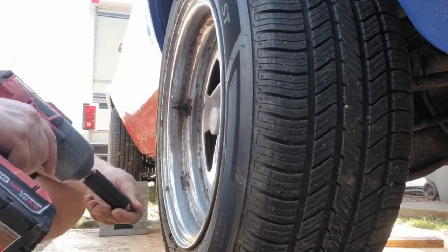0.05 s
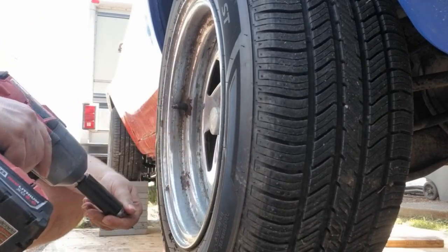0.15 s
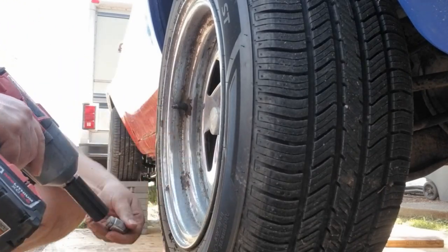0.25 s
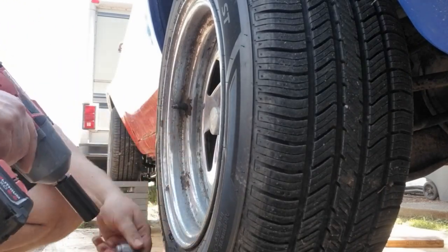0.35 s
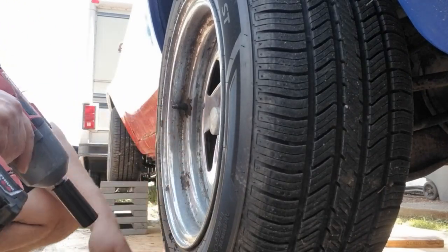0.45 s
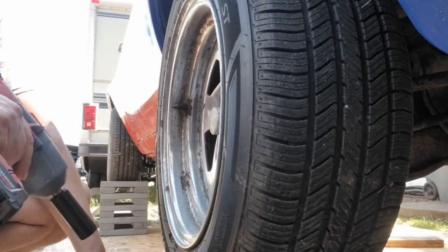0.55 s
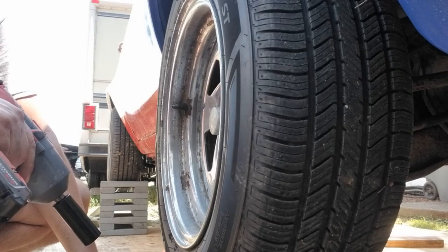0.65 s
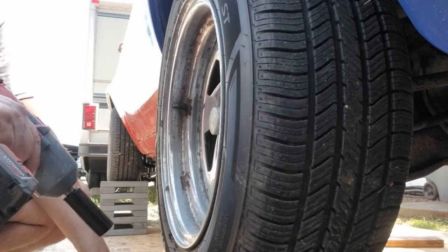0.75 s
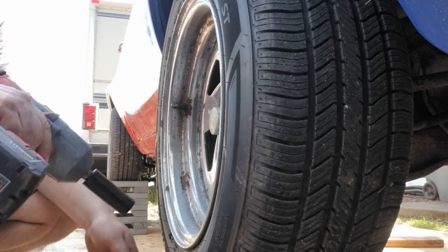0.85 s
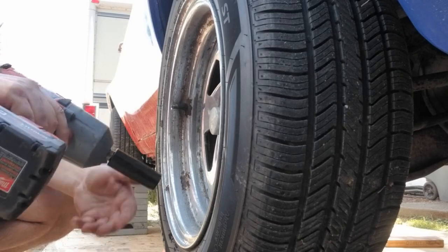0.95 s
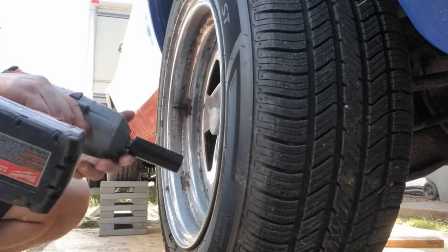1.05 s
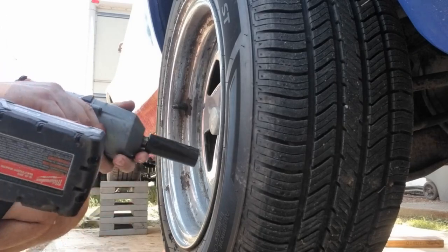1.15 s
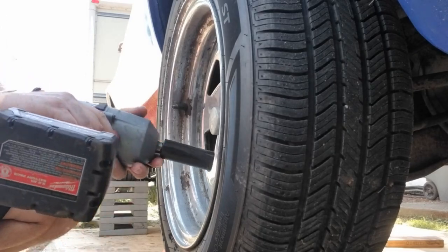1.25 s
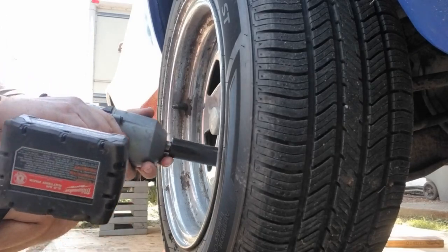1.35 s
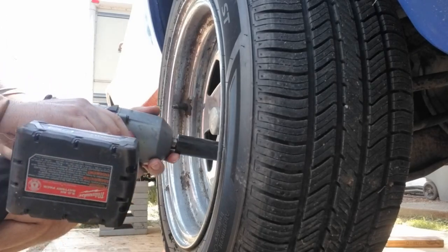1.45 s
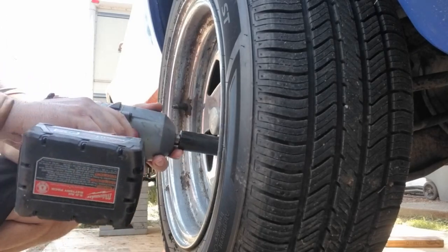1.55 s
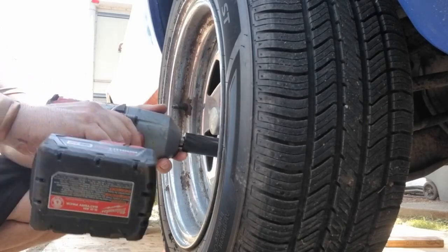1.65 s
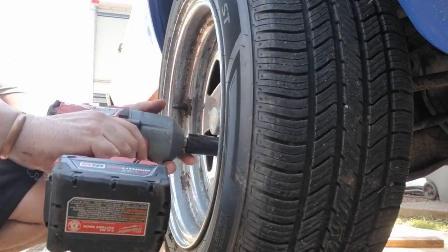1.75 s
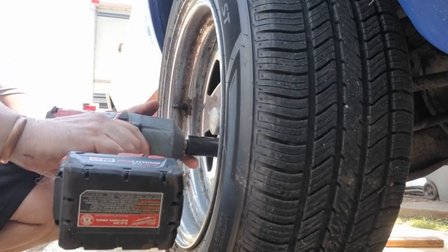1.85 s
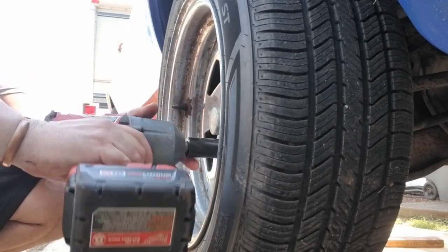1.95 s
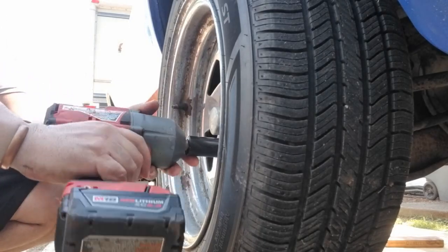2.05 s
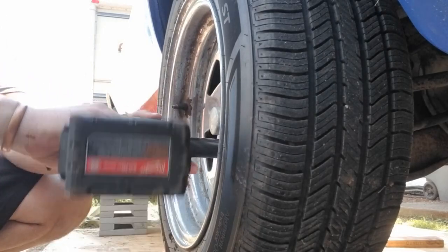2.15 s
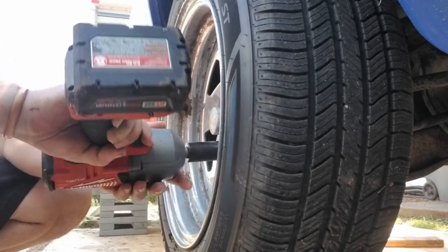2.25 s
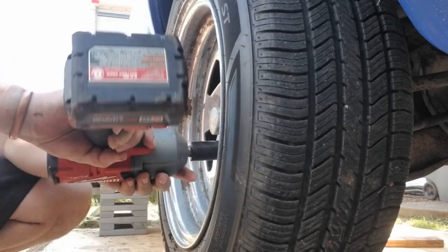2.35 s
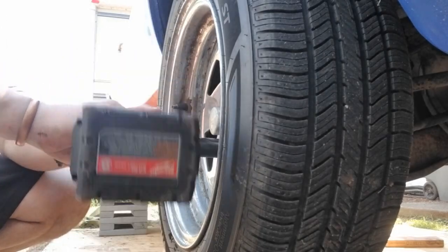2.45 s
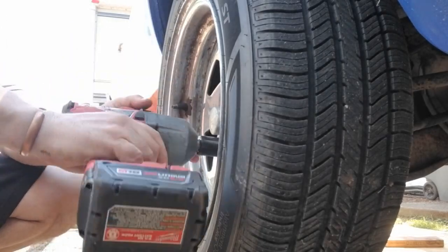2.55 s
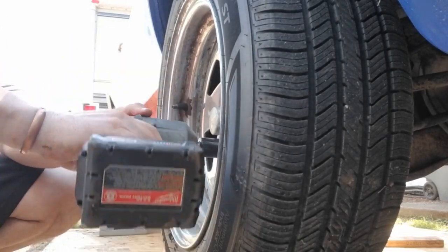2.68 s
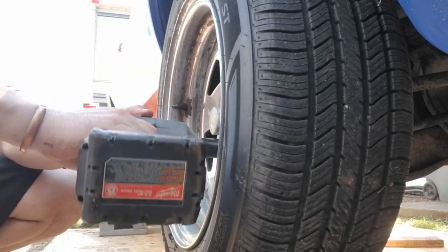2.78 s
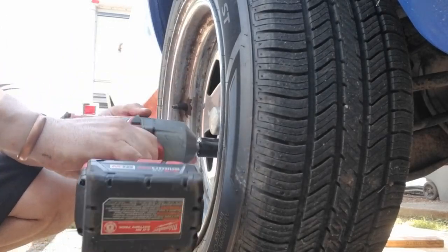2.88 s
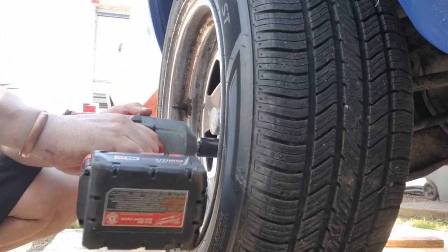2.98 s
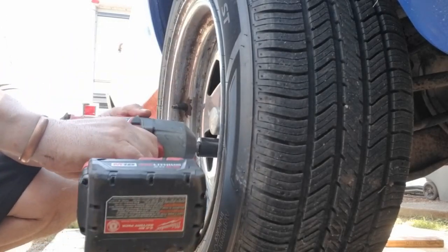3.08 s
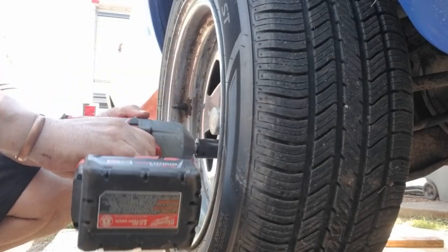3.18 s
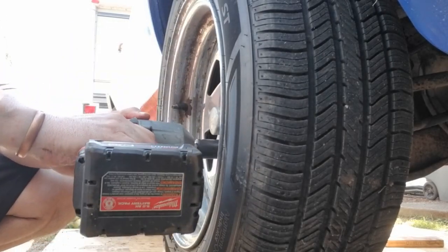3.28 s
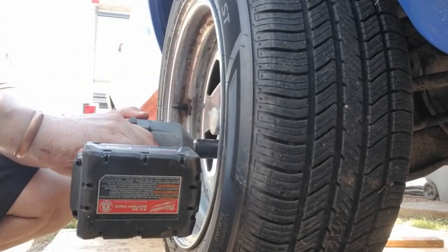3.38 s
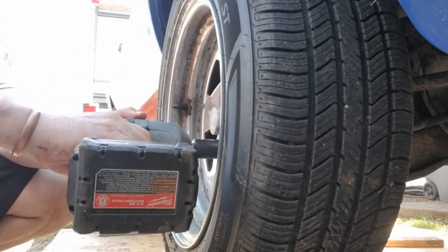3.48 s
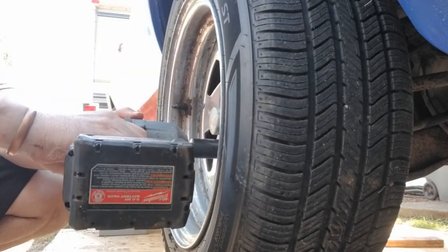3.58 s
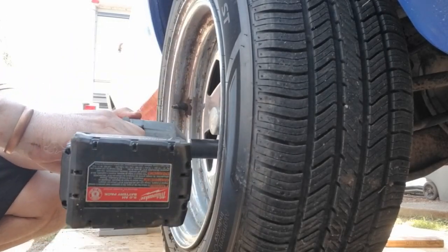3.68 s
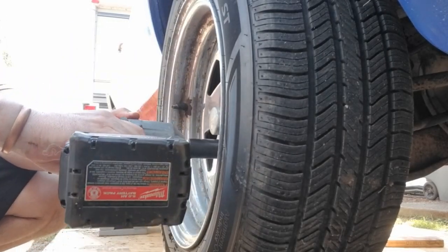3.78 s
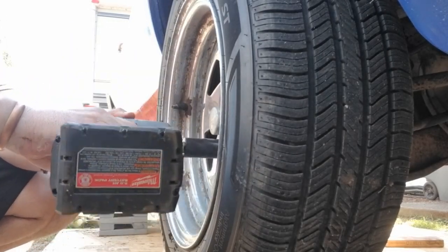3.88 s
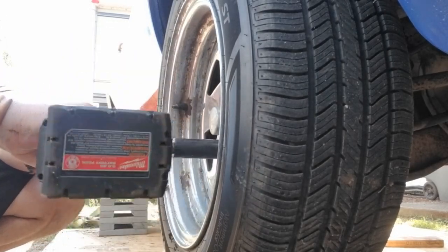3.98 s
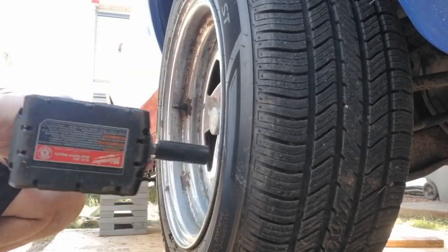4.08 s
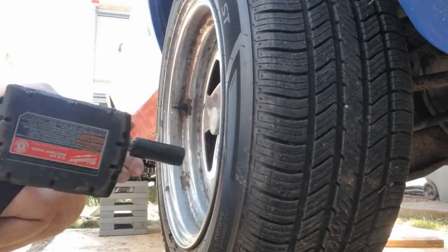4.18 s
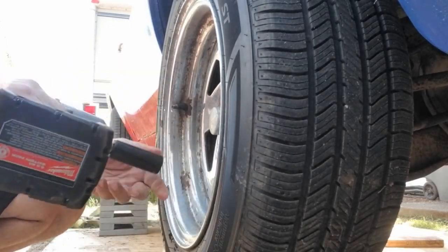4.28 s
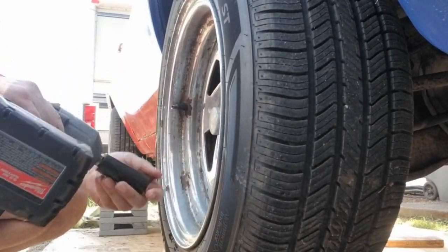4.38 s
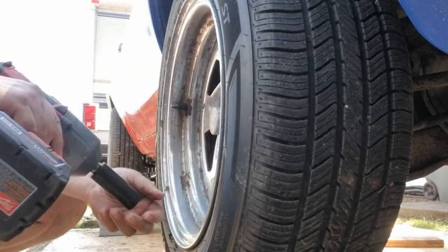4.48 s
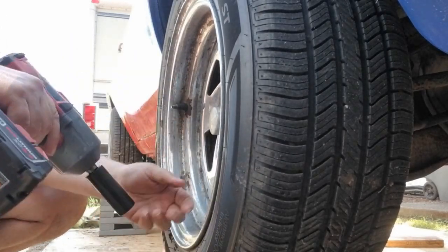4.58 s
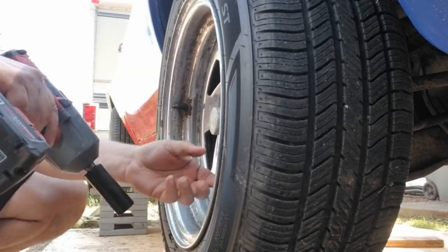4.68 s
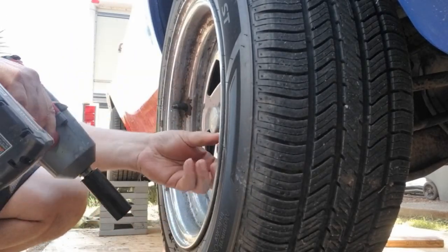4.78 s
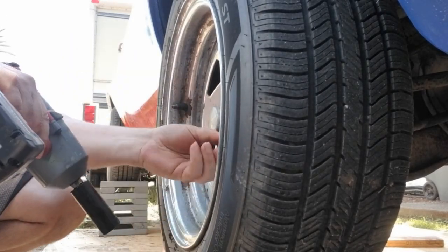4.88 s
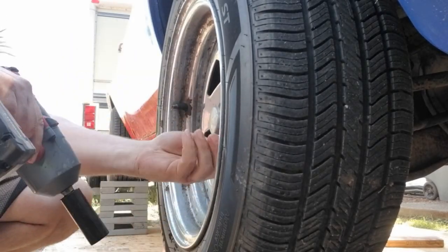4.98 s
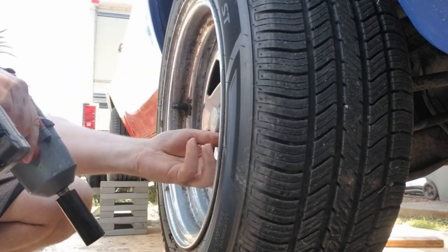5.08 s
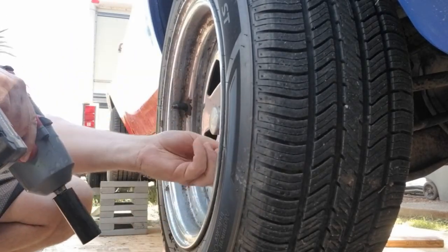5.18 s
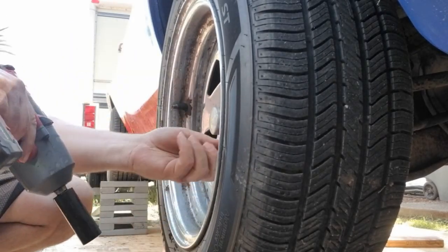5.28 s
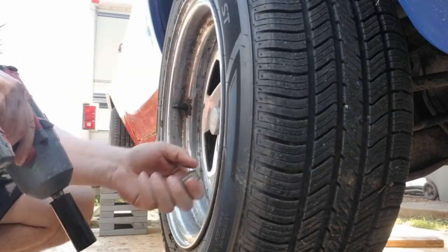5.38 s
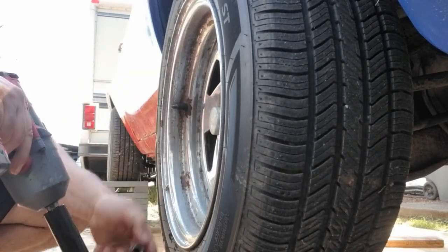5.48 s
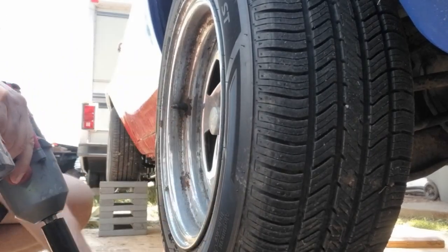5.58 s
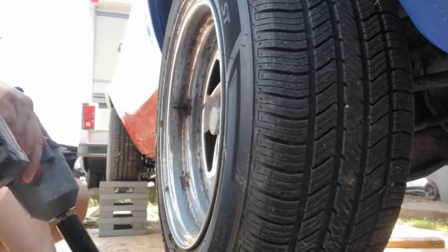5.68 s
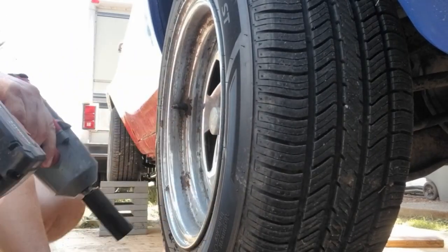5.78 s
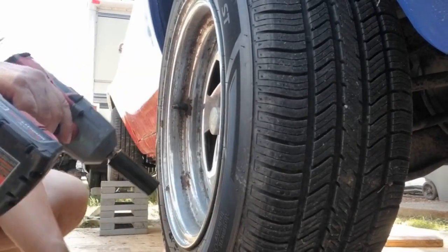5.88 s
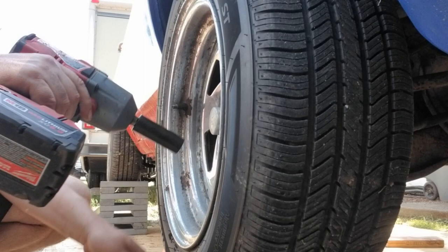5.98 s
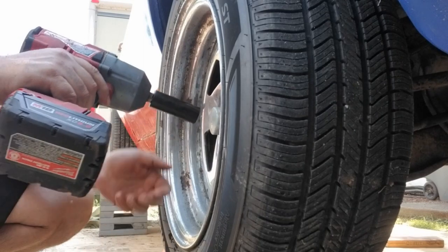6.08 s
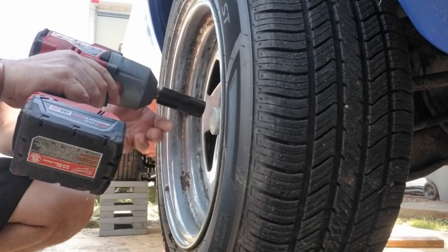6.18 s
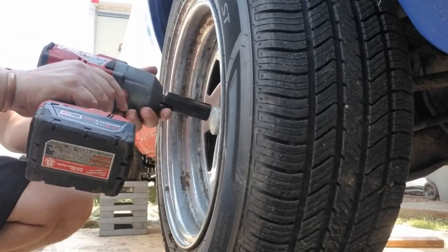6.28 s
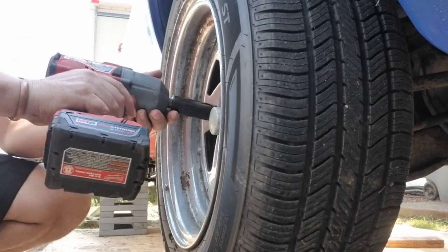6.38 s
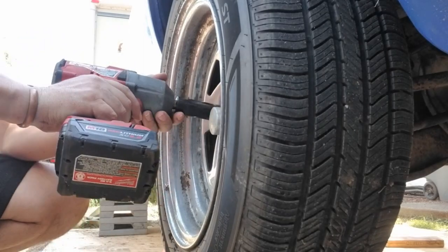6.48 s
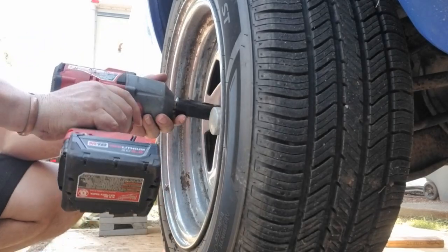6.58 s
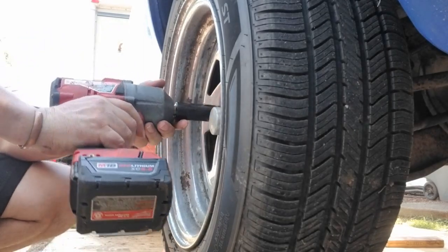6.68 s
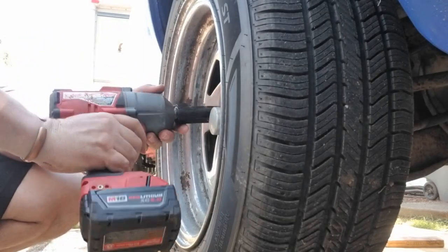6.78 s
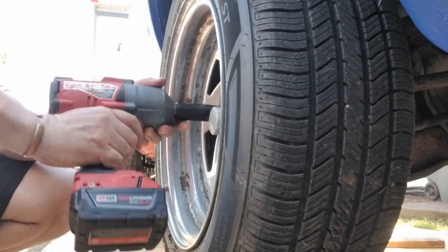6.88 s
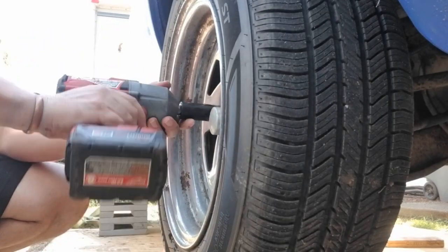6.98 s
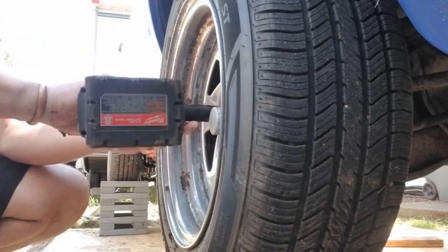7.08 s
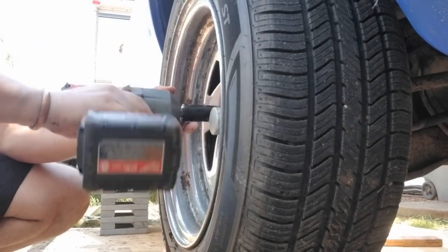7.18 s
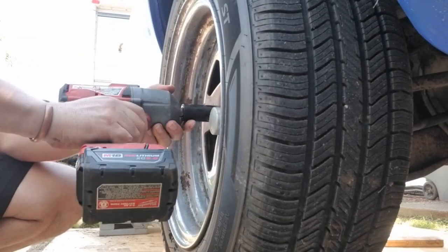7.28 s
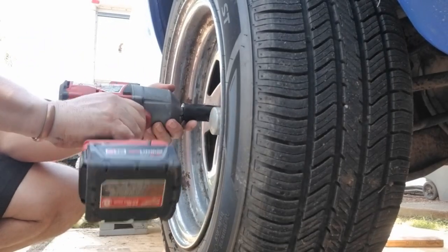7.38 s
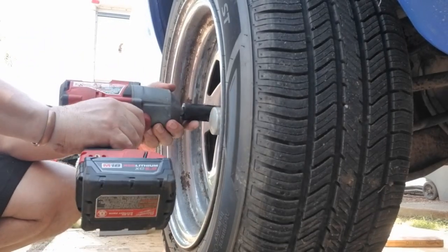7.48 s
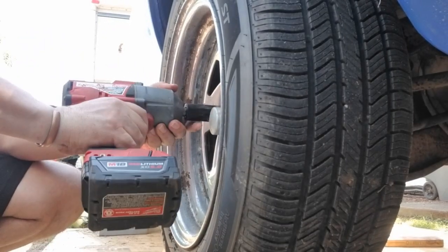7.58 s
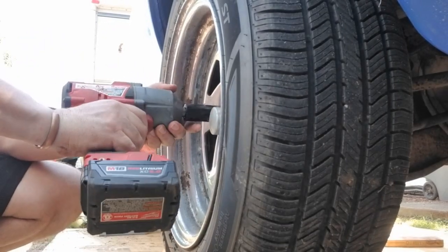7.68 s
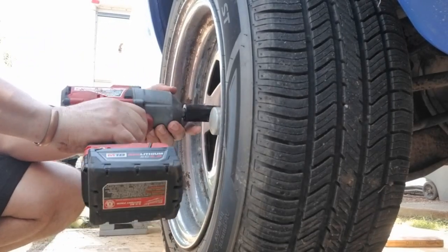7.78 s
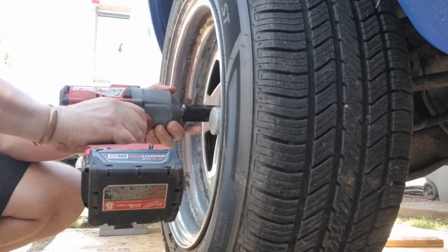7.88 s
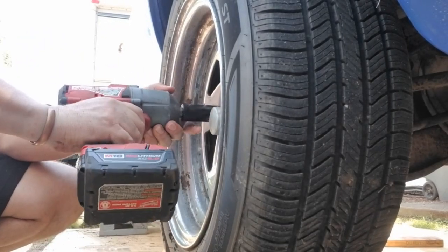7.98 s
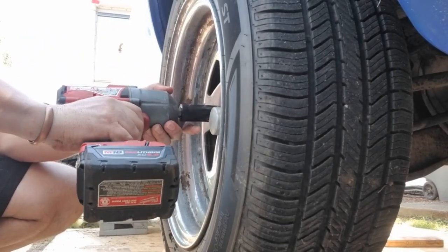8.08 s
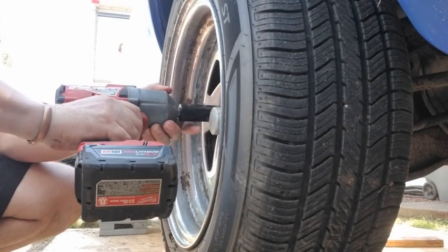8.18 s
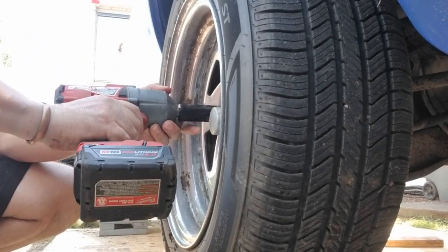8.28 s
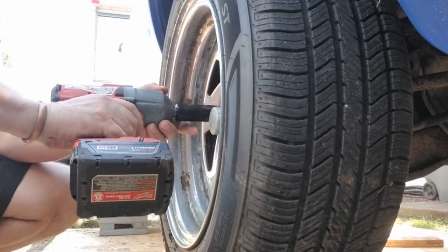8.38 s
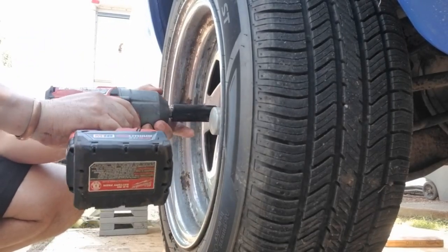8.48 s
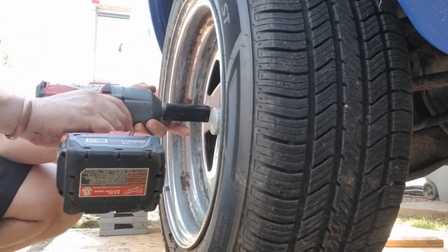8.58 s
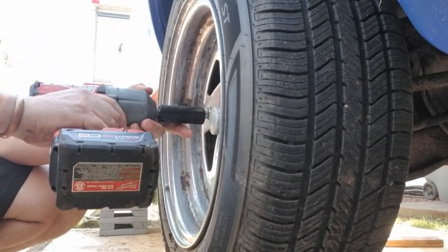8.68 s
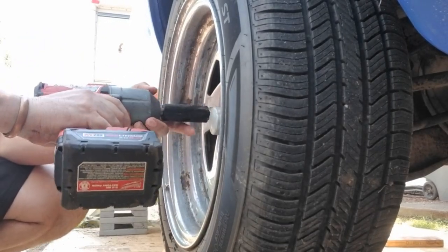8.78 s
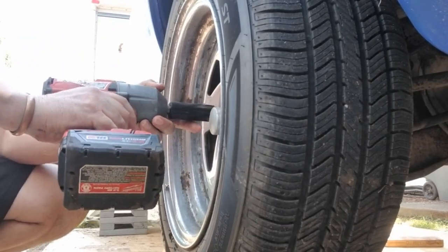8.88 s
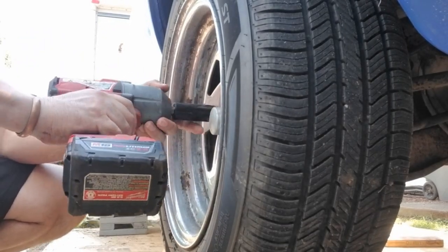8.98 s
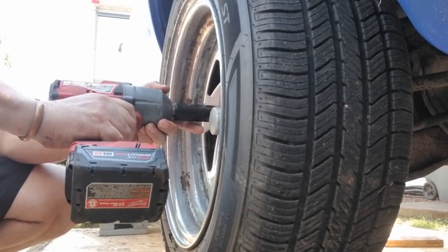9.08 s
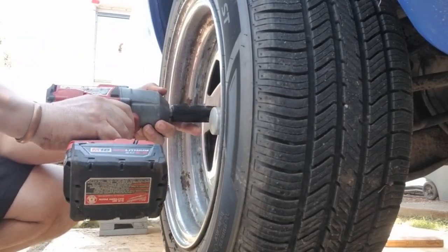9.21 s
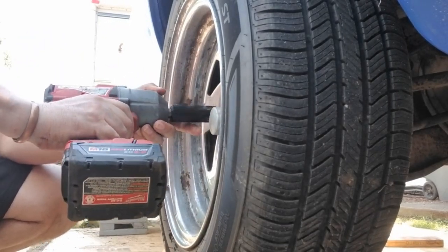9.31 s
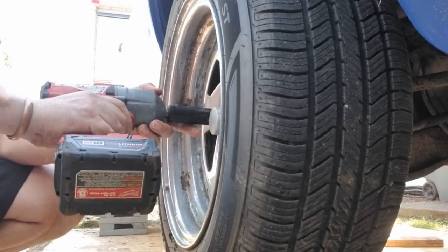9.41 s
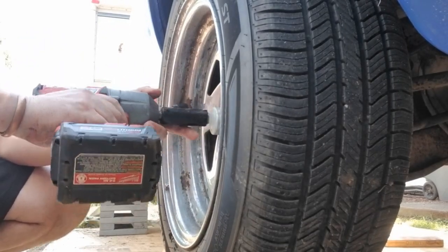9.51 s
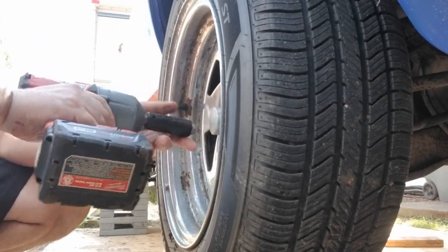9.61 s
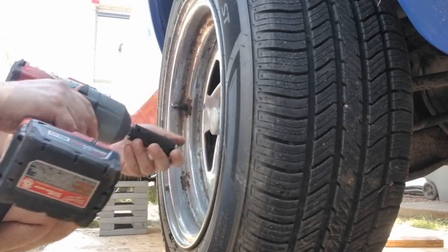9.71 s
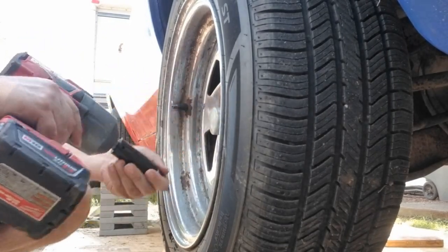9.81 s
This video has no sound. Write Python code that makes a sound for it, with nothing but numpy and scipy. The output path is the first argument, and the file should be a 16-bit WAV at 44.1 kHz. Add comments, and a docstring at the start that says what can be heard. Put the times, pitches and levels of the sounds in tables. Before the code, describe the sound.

Close stereo, a little right of centre, outdoors with short dull reflections and faint air, hiss and hum. A tiny high ring at 0.3 s, then a loose nut knocks sharply on a wooden board at 0.75 and settles in quickening, softer bounces until about 1.6. The socket clinks on the nut from 1.6 to 2.8, with a strong clack and low tyre boom at 2.63. At 2.8 the wrench bursts into loud, ringing steel hammering, about 27 blows a second, until 3.35; the motor whirs free, whining high, and brakes by 4.0. Faint clinks at 5, a softer nut knock at 5.8 and small taps to 6.3. Socket clinks at 6.4-7.0, tyre thump, then a second hammering burst from 7.4 to 7.9, free whir, stop by 8.55. At 9.07 a brief motor spin without hammering ends about 9.55 with a small clack and thin nut rings. A faint chirp sounds near 7.0.

```python
"""Impact wrench on lug nuts

A cordless impact wrench spins lug nuts off a car wheel outside a garage: struck steel modes, shaft-locked motor tones.
Twice the socket clinks onto a nut, the tyre booms, hammer blows rattle and the motor whirs free; a third pull only spins.
Loose nuts knock on a board and ring; shaped noise, a faint hum and far bird chirps lie behind."""
import sys
import numpy as np
from scipy import signal
from scipy.fft import rfft, irfft, next_fast_len
from scipy.io import wavfile
from scipy.ndimage import uniform_filter1d

SR = 44100
rng = np.random.default_rng(int(sys.argv[2]) if len(sys.argv) > 2 else 0)


def waveform_to_disk(signal):
    """Save audio, clipped to [-1, 1], as 16-bit WAV at the path in sys.argv[1]."""
    frames = np.transpose(np.atleast_2d(signal))
    scaled = np.clip(frames, -1, 1) * 32767
    samples = np.round(scaled).astype(np.int16)
    wavfile.write(sys.argv[1], SR, samples)


N = 434385
TIME_S = np.arange(N) / SR

# rel_db: level before the mix gains

# Trigger pulls: pressed_s, free_s, let_go_s, target_mesh_hz, rel_db, strain_db, gear_tones_db
PULLS = [(2.80, 3.2, 3.885, 3220, -38.5, 7.5, -3.5), (7.373, 7.78, 8.41, 3274, -39, 9.5, -2.5),
         (9.065, 9.145, 9.44, 3285, -36, -6, 0)]
# Shaft multiples that sound: order
SHAFT_ORDERS = [4, 6, 8, 9, 12, 13, 16, 18, 21, 26, 39]
# Level of each shaft order: rel_db
ORDER_LEVELS = [-18.5, -23.5, -20.5, -23.5, -27.5, -10.5, -22, -22, -24.5, -18, -21.5]
# Gear noise spectrum: freq_hz, rel_db
GEAR_NOISE = [(59, -39), (100, -14.5), (343, -16.5), (991, 2.5), (1650, -4), (2080, 0.5), (2420, -6.5),
              (3050, -0.5), (3400, -9), (7140, -14), (8280, -16.5), (9020, -19.5), (10900, -17.5),
              (13200, -18), (16000, -17.5)]
# Tool body resonances: freq_hz, half_width_hz, boost_db
HOUSING = [(930, 130, -7), (1930, 280, 3), (2674, 120, 3.5)]
# Hammer runs: first_s, last_s, middle_early_s, first_peak_rel_db, last_peak_rel_db, last_rattle_db
BURSTS = [(2.911, 3.238, .0045, -5.5, -8.5, -6.5), (7.477, 7.805, -.0007, -7.5, -7.5, -16.5)]
# Jaw graze before and bounce after a blow: delay_s, tight_db, loose_db (both re blow), rattle_db
REBOUNDS = [(-.009, -8.5, -10, -19), (0.0114, -3.5, -17, -8.5)]
# Single hammer blows and clacks outside the steady runs: start_s, peak_rel_db, treble_db
CLACKS = [(2.864, -3, -14), (2.901, -11, -10), (2.971, -8, -7.5), (3.263, -14.5, -7.5),
          (3.313, -14.5, -4.5), (3.355, -25, -5), (4.027, -33, -30), (7.422, -7, -10.5), (7.431, -7, -25),
          (7.463, -4.5, -7.5), (7.49, -10, -4.5), (7.529, -4.5, -15), (7.843, -14.5, -7.5),
          (7.903, -15.5, -7), (8.55, -34.5, -16.5), (9.101, -29, -16), (9.584, -20.5, -5.5)]
# Hammer steel spectrum: freq_hz, rel_db
STEEL = [(35, -33), (60, -11.5), (172, -22.5), (354, -14), (417, -12), (715, -6.5), (785, -5.5),
         (1010, -7.5), (1220, -5), (1950, 0), (3850, -6), (7230, -3.5), (9130, -7.5), (12700, -1.5),
         (16000, -9)]
# Anvil and socket modes: freq_hz, width_hz, rel_db
ANVIL = [(755.6, 25, -12), (1126, 45, -1.5), (1930, 260, -5), (2860, 79, -3), (4364, 110, 3.5),
         (5200, 97, -6), (7170, 490, 8.5)]
# Socket and nuts on stud and wheel: start_s, peak_rel_db, treble_db, rattle_db
CLINKS = [(1.568, -50.5, -32, 7), (1.717, -43, -5.5, -3), (1.741, -36, -30, 14), (1.765, -33, -21, 12),
          (1.776, -26.5, -17.5, -7), (2.305, -39, -10, -6.5), (2.342, -37, -33.5, 8), (2.596, -33, -2, -16),
          (2.632, -12, -6.5, -11.5), (2.769, -39.5, 9, -0.5), (2.386, -43, -30, -4), (4.055, -48, -6, -3),
          (5.0, -48, -8.5, -3), (5.046, -53.5, -7, 4.5), (5.106, -48, -16, 0), (6.026, -42, 10, -16),
          (6.436, -32.5, -4.5, 1), (6.48, -26, 3, 2), (6.493, -29, -5, -12), (6.539, -25.5, -15, -11),
          (6.547, -21.5, -28, -18.5), (6.816, -39.5, -3, 17), (6.98, -32.5, -13, 15),
          (7.018, -18.5, -17, -8), (8.867, -49.5, 2.5, 9)]
# Socket contact spectrum: freq_hz, rel_db
SOCKET = [(88, -26.5), (150, -13), (309, -11), (759, 0.5), (1240, -5), (2100, 1), (2450, -9.5), (3100, -6),
          (4760, -20), (7040, -16.5), (10800, -34), (13400, -23.5), (16000, -43)]
# Stud and brake modes: freq_hz, width_hz, rel_db
HUB = [(751, 34, -1), (1060, 60, -8), (1790, 190, -11.5), (2030, 93, -11.5), (2750, 64, -10.5),
       (4240, 25, -22.5), (5720, 58, -19)]
# Thread breaking loose: start_s, length_s, rel_db
GROANS = [(2.862, 0.03, -22.5), (7.421, 0.035, -23.5)]
# Shoves on the tyre: start_s, rel_db, low_modes_db
SHOVES = [(1.785, -31.5, -1), (2.633, -23, -8.5), (2.865, -32, -4), (6.551, -39, 1.5), (7.023, -31.5, 6),
          (7.426, -33.5, -8.5)]
# Tool leaning on the wheel: start_s, length_s, rel_db, low_modes_db
LEANS = [(1.76, 0.33, -54, 2.5), (2.31, .27, -47.5, -3), (2.56, 0.079, -36.5, -9), (3.2, 0.51, -58, 5),
         (6.52, 0.56, -49, 2.5), (7.0, 0.12, -37, 3.5), (7.7, 0.48, -58, 5)]
# Tyre modes: freq_hz, t60_s, rel_db
TYRE = [(56, 0.48, -5.5), (77.5, .55, -3), (102, .45, -7), (145.5, 0.36, 0), (182.7, 0.2, -4.5),
        (241.2, 0.28, -9), (311, 0.19, -10.5)]
# Nuts landing on the board: start_s, peak_rel_db
KNOCKS = [(0.751, -8.5), (0.796, -26), (0.863, -29), (0.901, -37.5), (5.804, -21), (5.967, -31),
          (6.026, -32), (6.04, -35.5), (6.157, -34), (6.288, -41), (6.331, -39)]
# Landing hardness: peak_rel_db, treble_db
HARDNESS = [(-41, -38), (-29.5, -13), (-7, -1.5)]
# Board contact spectrum: freq_hz, rel_db
WOOD = [(20, -31), (90, -16.5), (200, -4), (310, 6), (520, -3.5), (950, -3.5), (1400, -17), (3500, -36),
        (16000, -45)]
# Board modes: freq_hz, width_hz, rel_db
BOARD = [(283, 40, -2.5), (331.5, 33, -4), (396.7, 32, 2), (570, 22, -6.5), (736, 22, -1), (1013, 18, -9.5)]
# Loose nut ringing: start_s, rel_db
PINGS = [(0.271, -45), (1.718, -62), (4.05, -65), (6.436, -47), (6.48, -38), (8.88, -61), (9.25, -41),
         (9.3, -42), (9.33, -38), (9.582, -44), (9.752, -56)]
# Faint chirps: start_s, length_s, start_hz, end_hz, level_db
CHIRPS = [(0.081, .17, 11900, 12300, -64.5), (0.26, 0.15, 4740, 4430, -77),
          (1.901, 0.15, 4550, 4320, -69.5), (7.022, 0.13, 4760, 4340, -59.5)]
# Outdoor air spectrum: freq_hz, rel_db
AIR = [(15, -42.5), (25, -15), (59, 1), (185, -24), (249, -19), (354, -43), (1190, -49.5), (1700, -28),
       (2840, -27.5), (3920, -43.5), (4610, -50), (16000, -40.5)]
# Hiss spectrum: freq_hz, rel_db
HISS = [(450, -10), (1150, -12), (1800, -2), (2900, -2), (3800, -11.5), (5500, -14), (8500, -25.5),
        (12000, -17), (16000, -19.5)]
# Hiss swells, added to the steady hiss: start_s, rise_s, end_s, level_db
HISS_SWELLS = [(.2, 0.67, 3.7, -67.5), (4.5, 1.98, 8.1, -64.5), (8.8, 0.35, 9.8, -77.5)]
# Left-right likeness of noise: freq_hz, correlation
LIKENESS = [(25, .6), (120, .96), (300, .95), (600, .8), (2000, .35), (4000, .3), (8000, .48)]
# Left channel phase lag: freq_hz, lag_rad
PHASE_LAG = [(200, 0), (1000, 1.1), (2200, 0.73), (4500, 0.73), (8000, 0.013)]

# motor; the held speed is a share of the speed before creep
TEETH, POLE_PAIRS, SWITCH_HZ = 13, 4, 7912
SPIN_S, HELD_SHARE, CREEP_SHARE, CREEP_S = .048, .66, .115, .3
EASE_S, EASE_SHARE, BRAKE_S, BRAKE_CURVE = .06, .04, .14, 1.35
ONSET_S, STRAIN_LAG_S, STRAIN_FADE_S = .03, .05, .033
# hammer
NOMINAL_BLOWS_PER_S = 27.4
TIGHT_TREBLE_DB, LOOSE_TREBLE_DB, TIGHT_RATTLE_DB = -11.5, -4, -.5
BLOW_SCATTER_DB, REBOUND_SCATTER_DB, REBOUND_STRAY_S = 1.3, 2.6, .0009
CLACK_RATTLE_DB = -12.5
# tyre
LEAN_ATTACK_S, LEAN_RELEASE_S, SHAKE_REL_DB = .047, .23, -23.5
# nuts
SETTLE_S, SETTLE_REL_DB, FIRST_GAP_S, GAP_RATIO, BOUNCE_LOSS_DB = 1.12, -33, .089, .84, 2.5
KNOCK_RATTLE_DB = -6
NUT_HZ, NUT_T60_S = 13530, .16
# background and output
AIR_DB, HISS_DB, HISS_DROP_S = -66.5, -81.5, .066
HUM_HZ, HUM_DB = 240, -79.5
EDGE_HZ = 16100


def hammer():
    """Near-steady hammer blows, brighter as the nut loosens, each with a graze before and a bounce after."""
    rows = [(s, db, treble_db, CLACK_RATTLE_DB) for s, db, treble_db in CLACKS]
    for first, last, early_s, first_db, last_db, last_rattle_db in BURSTS:
        count = round((last - first) * NOMINAL_BLOWS_PER_S) + 1
        for loose in np.linspace(0, 1, count):
            s = first + (last - first) * loose - early_s * np.sin(np.pi * loose)
            db = first_db + (last_db - first_db) * loose
            treble_db = TIGHT_TREBLE_DB + (LOOSE_TREBLE_DB - TIGHT_TREBLE_DB) * loose
            rattle_db = TIGHT_RATTLE_DB + (last_rattle_db - TIGHT_RATTLE_DB) * loose ** 3
            rows.append((s, db + BLOW_SCATTER_DB * rng.normal(), treble_db, rattle_db))
            for delay_s, tight_db, loose_db, after_db in REBOUNDS:
                softer_db = tight_db + (loose_db - tight_db) * loose
                softer_db += REBOUND_SCATTER_DB * rng.normal()
                start_s = s + delay_s + REBOUND_STRAY_S * rng.normal()
                rows.append((start_s, db + softer_db, treble_db, after_db))
    return rows


def strikes(rows, spectrum, modes, split_hz, crack_s, rattle_s, grain, ring_db, push_db, rise_s, size=14000):
    """Each contact is a push, a short crack and a grainy after-rattle, coloured by the body and ringing its modes."""
    out, t = np.zeros((2, N)), np.arange(size) / SR
    body = ringing(modes)
    low_pass = signal.butter(2, min(split_hz, SR / 3), fs=SR)
    upper = np.fft.rfftfreq(size, 1 / SR) > split_hz
    for s, db, treble_db, rattle_db in rows:
        slow_noise = unit(uniform_filter1d(rng.standard_normal(size), size=60))
        chatter = unit(np.exp(grain * slow_noise))
        since = np.maximum(t - rise_s, 0)
        crack = np.exp(-since / crack_s)
        rattle = amp(rattle_db) * chatter * np.exp(-since / rattle_s)
        force = noise(size) * (crack + rattle)
        force *= np.minimum(t / rise_s, 1) ** 3
        force += amp(push_db) * np.sin(np.pi * np.minimum(t / rise_s / 2, 1)) ** 2
        ring = signal.fftconvolve(force, body, axes=1)[:, :size]
        hit = colour(force, spectrum) + amp(ring_db) * ring
        # steer the treble share toward treble_db, within limits
        power = (abs(rfft(hit)) ** 2).sum(0)
        treble_share = np.sqrt(power[upper].sum() / power.sum())
        lift = np.clip(amp(treble_db) / treble_share, .15, 2.5)
        low = signal.filtfilt(*low_pass, hit)
        hit = low + lift * (hit - low)
        # peak of a 130-sample rms
        peak = np.sqrt(uniform_filter1d((hit ** 2).mean(0), size=130).max())
        add(out, s, amp(db) * hit / peak)
    return out


def throttle(pressed, free, let_go, target_hz, db, strain_db):
    """Times, mesh pitch and gain of a pull: motor starts, labours under the hammer, runs free, sags and brakes."""
    t = np.arange(pressed, let_go + BRAKE_S, 1 / SR)
    held = HELD_SHARE * (1 - np.exp(-(t - pressed) / SPIN_S))
    running_s = np.maximum(t - free, 0)
    speed = 1 - (1 - held) * np.exp(-running_s / SPIN_S)
    speed *= 1 - CREEP_SHARE * np.exp(-running_s / CREEP_S)
    # the finger eases off, then the brake stops the shaft
    easing = np.clip(1 + (t - let_go) / EASE_S, 0, 1)
    braking = np.clip((t - let_go) / BRAKE_S, 0, 1)
    speed *= (1 - EASE_SHARE * easing) * (1 - braking ** BRAKE_CURVE)
    # strain lets up just after the nut comes free
    strain = 1 / (1 + np.exp((t - free - STRAIN_LAG_S) / STRAIN_FADE_S))
    gate = np.minimum((t - pressed) / ONSET_S, 1) ** 2 * (1 - braking ** 3) ** 2
    return t, target_hz * np.maximum(speed, 0), gate * amp(db + strain_db * strain)


def motor(t, mesh_hz, gain, whine_db, whir_db=-2, switch_db=-19, load_db=-5.5, wobble=.0035, judder=.025,
          throb=.26, fading=.51):
    """Gear tones and noise follow the shaft; the speed controller whistles either side of its switching rate."""
    size = len(t)
    shaft_hz = mesh_hz / TEETH
    speed = shaft_hz / shaft_hz.max()
    # speeding up or braking loads the gears and makes them judder
    load = np.clip(4 * (1 - speed), 0, 1)
    flutter = unit(uniform_filter1d(rng.standard_normal(size), size=300))
    angle = 2 * np.pi * np.cumsum(shaft_hz * (1 + (wobble + judder * load ** 2) * flutter)) / SR

    def fade():
        """Slow random gain per channel, so the tones waver."""
        knots = np.linspace(t[0], t[-1], 20)
        return 1 + fading * np.array([np.interp(t, knots, rng.standard_normal(20)) for channel in range(2)])

    def tone(phase):
        """Fading stereo sine."""
        return np.sqrt(2) * fade() * np.sin(phase + rng.uniform(0, np.pi / 2, (2, 1)))

    def boost(hz):
        """Gain of a tone sweeping through the housing resonances."""
        return 1 + sum(amp(db) / (1 + ((hz - centre) / width) ** 2) for centre, width, db in HOUSING)

    gears = sum(amp(db) * boost(k * shaft_hz) * tone(k * angle) for k, db in zip(SHAFT_ORDERS, ORDER_LEVELS))
    carrier = 2 * np.pi * SWITCH_HZ * t
    field = POLE_PAIRS * 2 * np.pi * np.cumsum(shaft_hz) / SR
    # whistle holds until top speed, then only above 96 % of it
    trigger = uniform_filter1d(1. * ((t < t[speed.argmax()]) | (speed > .96)), size=900)
    whistle = trigger * (tone(carrier + field) + 1.4 * tone(carrier - field) + .5 * tone(2 * carrier - field))
    whir = noise(size, GEAR_NOISE) * unit((1 + throb * np.sin(angle)) * np.exp(.2 * flutter))
    # loaded gears rattle the housing's top mode
    centre, width, _ = HOUSING[-1]
    band = signal.butter(2, [centre - width, centre + width], "band", fs=SR)
    rattle = unit(signal.lfilter(*band, noise(size)))
    whine = amp(whine_db) * (gears * speed + amp(switch_db) * whistle)
    sound = amp(whir_db) * whir * np.sqrt(speed) + whine + amp(load_db) * load * rattle
    return t[0], sound * gain


def groans(slip_hz=370, jitter=.5, scrape_db=-3, size=8000):
    """The thread sticks and slips at irregular intervals, scraping and ringing the hub."""
    out, t = np.zeros((2, N)), np.arange(size) / SR
    for s, length, db in GROANS:
        drift = uniform_filter1d(rng.standard_normal(size), size=200) * np.sqrt(200) / 2
        turns = np.cumsum(slip_hz * (1 + jitter * drift)) / SR
        slips = np.diff(np.floor(turns), prepend=0) * (t < length) * np.ones((2, 1))
        ring = signal.fftconvolve(slips, ringing(HUB), axes=1)[:, :size]
        sound = ring + amp(scrape_db) * colour(slips, SOCKET)
        add(out, s, amp(db) * sound / sound[:, t < length].std())
    return out


def tyre(blows, size=30000):
    """Tyre modes boom after each shove, and rumble while the tool leans on or shakes the wheel."""
    t, out = np.arange(size) / SR, np.zeros((2, N))
    # the squeezed tyre starts sharp and sags to its resting pitch
    settled = t + .006 * (1 - np.exp(-t / .021))

    def boom(low_db):
        """Decaying modes, those below 110 Hz scaled by low_db."""
        return sum(amp(db + low_db * (hz < 110) - 60 * t / t60)
                   * np.sin(2 * np.pi * (hz * settled + rng.random())) for hz, t60, db in TYRE)

    for s, db, low_db in SHOVES:
        add(out, s, amp(db) * boom(low_db) * (1 - np.exp(-t / .0074)))
    rub = noise(next_fast_len(N))[:, :N]

    def rumble(low_db):
        """Noise through the shortened boom."""
        response = boom(low_db) * t * np.exp(-t / .082)
        return unit(signal.oaconvolve(rub, response[None], axes=1)[:, :N])

    for s, length, db, low_db in LEANS:
        out += amp(db) * swell(s, LEAN_ATTACK_S, s + length, LEAN_RELEASE_S) * rumble(low_db)
    shake = np.sqrt(abs(uniform_filter1d((blows ** 2).mean(0), size=4000)))
    return out + amp(SHAKE_REL_DB) * shake * rumble(3)


def landings(count=7):
    """Single landings and one nut rocking to rest in sooner, softer bounces; harder is brighter."""
    bounces = []
    for k in range(count):
        s = SETTLE_S + FIRST_GAP_S * (1 - GAP_RATIO ** k) / (1 - GAP_RATIO)
        bounces.append((s, SETTLE_REL_DB - BOUNCE_LOSS_DB * k))
    return [(s, db, np.interp(db, *np.transpose(HARDNESS)), KNOCK_RATTLE_DB) for s, db in KNOCKS + bounces]


def pings(size=16000):
    """A free nut rings with one very high decaying note."""
    t, out = np.arange(size) / SR, np.zeros((2, N))
    for s, db in PINGS:
        add(out, s, amp(db - 60 * t / NUT_T60_S) * np.sin(2 * np.pi * NUT_HZ * t))
    return out


def outdoors():
    """Shaped-noise air, a drifting hiss, a steady sine hum and noise-blurred chirps."""
    hiss_gain = amp(HISS_DB)
    hiss_gain = hiss_gain + sum(amp(db) * swell(s, rise_s, end, HISS_DROP_S) for s, rise_s, end, db in HISS_SWELLS)
    out = amp(AIR_DB) * noise(N, AIR) + hiss_gain * noise(N, HISS)
    out += amp(HUM_DB) * np.sqrt(2) * np.sin(2 * np.pi * HUM_HZ * TIME_S)
    for s, length, start_hz, end_hz, db in CHIRPS:
        u = np.linspace(0, 1, round(length * SR))
        blur = signal.lfilter(*signal.butter(2, 260, fs=SR), noise(len(u)))
        glide = np.sin(2 * np.pi * np.cumsum(start_hz + (end_hz - start_hz) * u) / SR)
        add(out, s, amp(db) * unit(blur * glide * u * (1 - u) ** 2))
    return out


def driveway(x, t60_s=.19, size=20000):
    """Dull, scattered reflections from ground, car and garage wall: a decaying noise tail."""
    t = np.arange(size) / SR
    spectrum = [(100, 9.5), (3000, -8.0), (7000, -10.0), (16000, -9.5)]  # freq_hz, rel_db
    tail = noise(size, spectrum) * amp(-60 * t / t60_s) * (t > .006)
    return signal.fftconvolve(x, tail / np.linalg.norm(tail[0]), axes=1)[:, :N]


def rightward(x, left_db=-3):
    """Close sound from the right is weaker and phase-shifted on the left."""
    size = next_fast_len(N + 2000)
    z = rfft(x, size)
    z[0] *= np.exp(-1j * read(PHASE_LAG, np.fft.rfftfreq(size, 1 / SR)))
    return irfft(z, size)[:, :N] * pan(left_db)


def amp(db):
    """Decibels to gain."""
    return 10 ** (np.asarray(db) / 20)


def unit(x):
    """Scales to rms 1."""
    return x / np.sqrt(np.mean(x ** 2) + 1e-20)


def read(points, hz):
    """Interpolates a curve on a log-frequency axis."""
    f, value = np.transpose(points)
    return np.interp(np.log(hz + 1), np.log(f + 1), value)


def add(mix, s, sound):
    """Mixes a sound in at time s."""
    part = mix[:, max(round(s * SR), 0):][:, :sound.shape[-1]]
    part += sound[..., :part.shape[1]]


def pan(left_db):
    """Channel gains, left over right by left_db."""
    return amp(np.array([[left_db], [-left_db]]) / 2)


def swell(start, rise_s, end, fall_s):
    """Gain over time: eases in, holds until the end, dies away."""
    return np.clip((TIME_S - start) / rise_s, 0, 1) ** 2 * np.exp(-np.maximum(TIME_S - end, 0) / fall_s)


def noise(size, spectrum=None):
    """Stereo noise with frequency-dependent likeness; white unless given a spectrum."""
    hz = np.fft.rfftfreq(size, 1 / SR)
    mid, side = rfft(rng.standard_normal((2, size)))
    same = np.clip(read(LIKENESS, hz), -1, 1)
    z = mid * np.sqrt(1 + same) + np.array([[1], [-1]]) * side * np.sqrt(1 - same)
    gain = amp(read(spectrum, hz)) if spectrum else 1
    return unit(irfft(z * gain, size))


def colour(x, spectrum, size=4096):
    """Causal minimum-phase filter of unit energy with the given spectrum."""
    log_gain = np.log(amp(read(spectrum, abs(np.fft.fftfreq(size, 1 / SR)))))
    taps = np.fft.ifft(np.exp(np.conj(signal.hilbert(log_gain)))).real[:size // 2]
    return signal.fftconvolve(x, taps[None] / np.linalg.norm(taps), axes=1)[:, :x.shape[1]]


def ringing(modes, size=12000):
    """Impulse response of decaying modes; the high ones reach the two channels out of step."""
    t, ring = np.arange(size) / SR, 0
    for hz, width, db in modes:
        phase = rng.normal(size=(2, 1)) * min(hz / 2000, 2)
        ring = ring + amp(db) * np.exp(-np.pi * abs(width) * t) * np.sin(2 * np.pi * hz * t + phase)
    return ring / np.linalg.norm(ring[0])


def scene():
    """The wrench works close by, a little to the right."""
    blows = amp(-6.0) * strikes(hammer(), STEEL, ANVIL, split_hz=6000, crack_s=.0025, rattle_s=.018,
                                grain=.13, ring_db=-13.5, push_db=-12.5, rise_s=.0013)
    whir = np.zeros((2, N))
    for *pull, whine_db in PULLS:
        add(whir, *motor(*throttle(*pull), whine_db))
    clinks = strikes(CLINKS, SOCKET, HUB, split_hz=3000, crack_s=.0013, rattle_s=.016,
                     grain=.47, ring_db=-4.5, push_db=-9.5, rise_s=.0012)
    wheel = clinks * amp(-3.5) + groans()
    nuts = strikes(landings(), WOOD, BOARD, split_hz=646, crack_s=.0048, rattle_s=.022,
                   grain=.28, ring_db=-14.5, push_db=-1.5, rise_s=.0011)
    tool = rightward(blows + amp(1.0) * whir, left_db=-2.5)
    near = tool + wheel * pan(-.6) + nuts * pan(-1.5) + pings()
    return near + amp(-15.0) * driveway(near) + tyre(blows) * pan(-.8) + outdoors()


def record(dry):
    """Rounds off peaks near full scale, then low-passes at the recorder's band limit."""
    rounded = 1.2 * np.tanh(dry / 1.2)
    taps = signal.firwin(401, EDGE_HZ, window=("kaiser", 8), fs=SR)
    return signal.oaconvolve(rounded, taps[None], "same")


dry = scene()
out = record(dry)
waveform_to_disk(out)
```